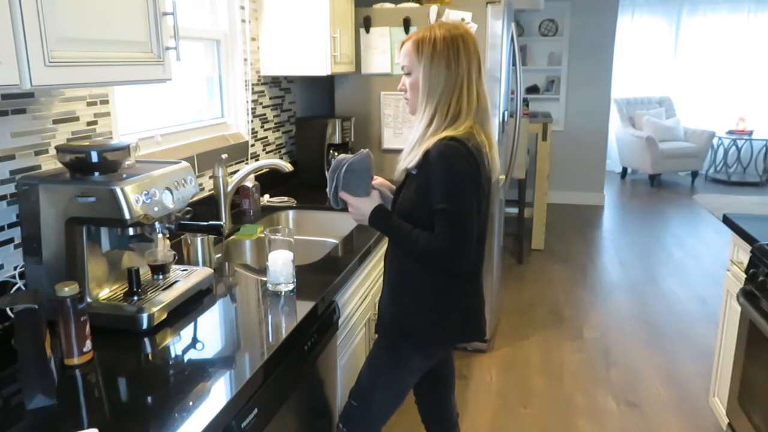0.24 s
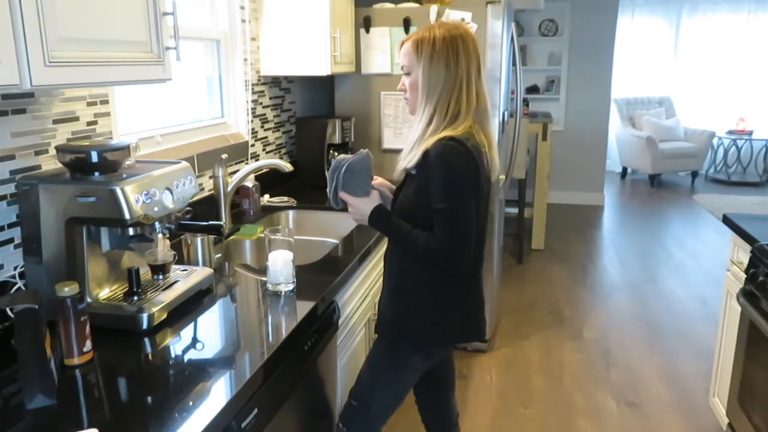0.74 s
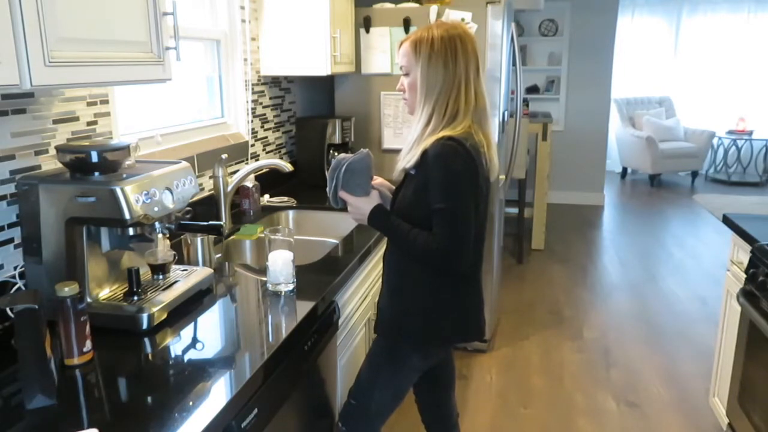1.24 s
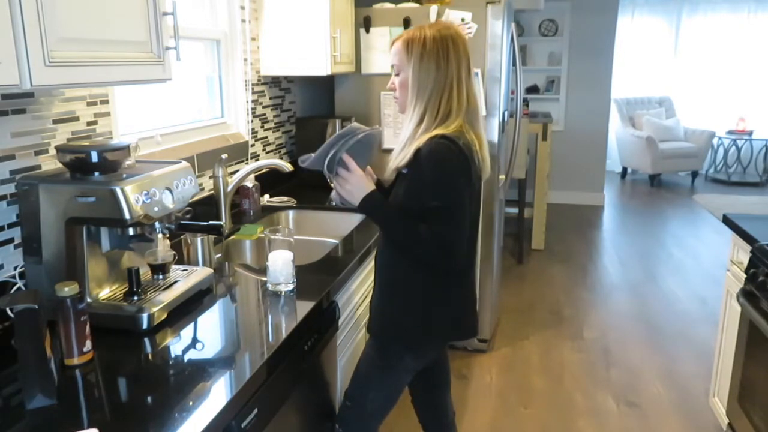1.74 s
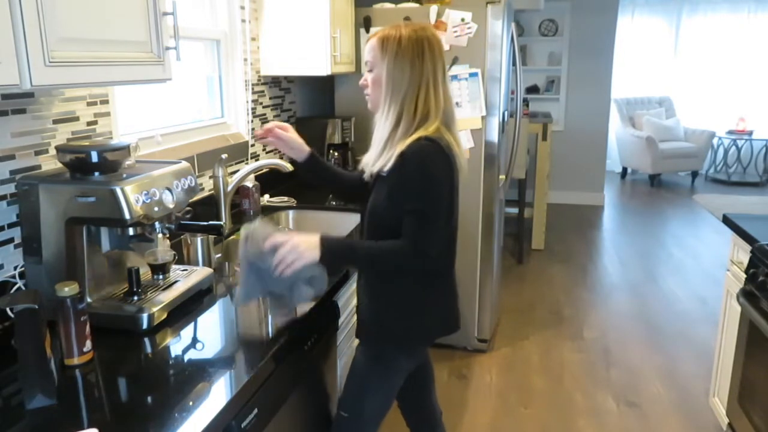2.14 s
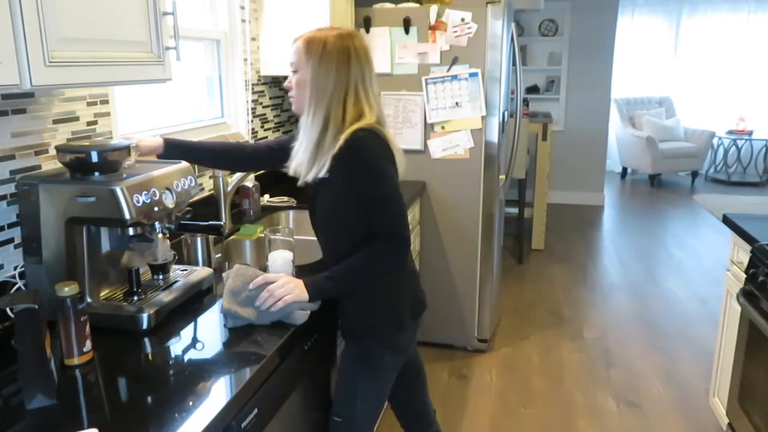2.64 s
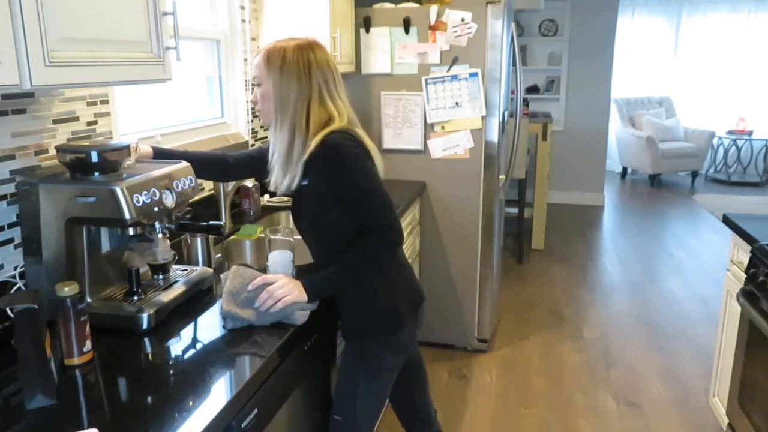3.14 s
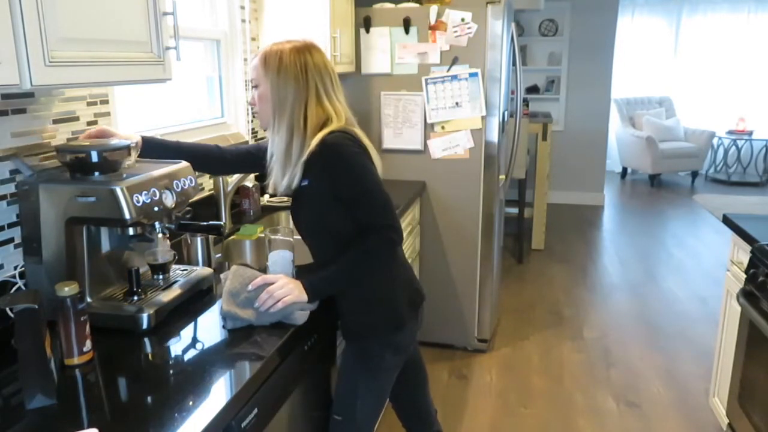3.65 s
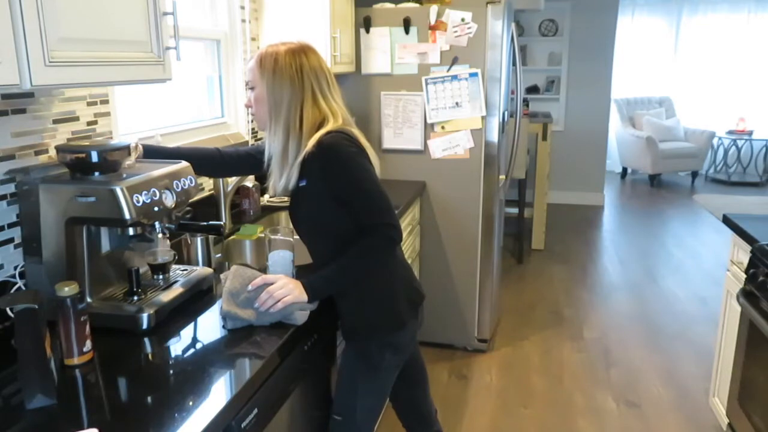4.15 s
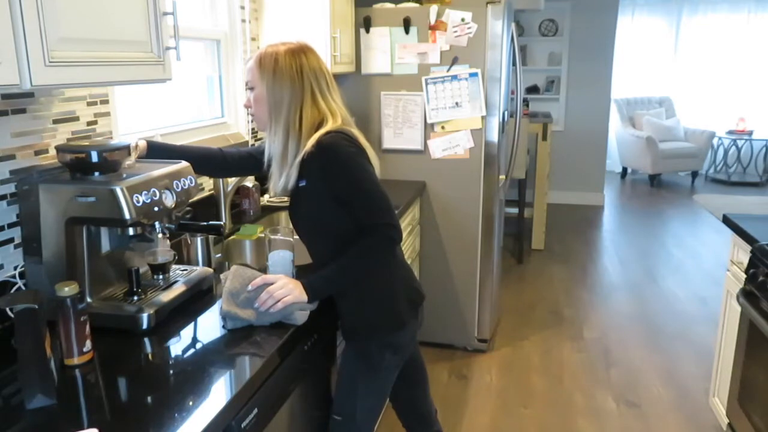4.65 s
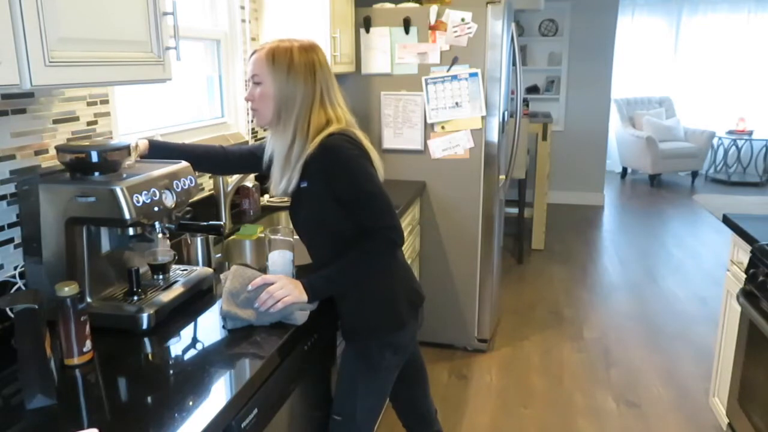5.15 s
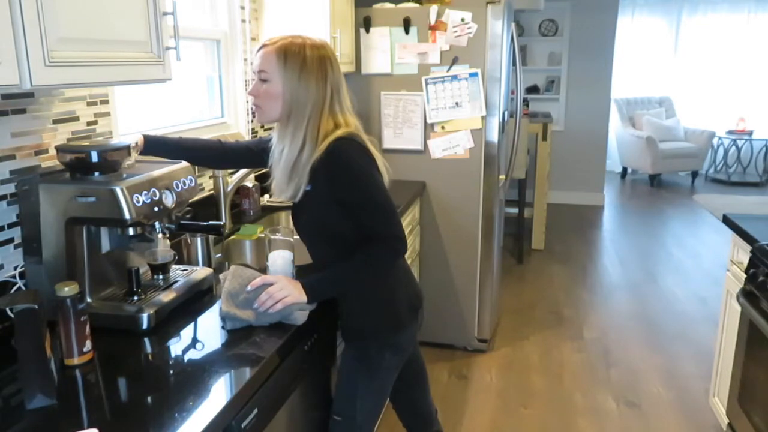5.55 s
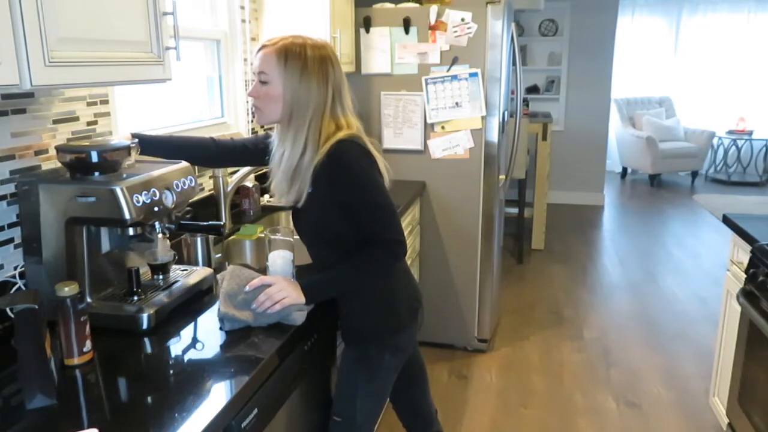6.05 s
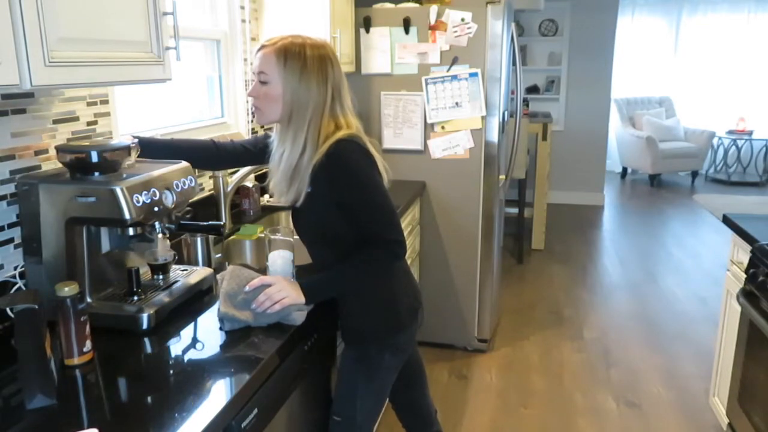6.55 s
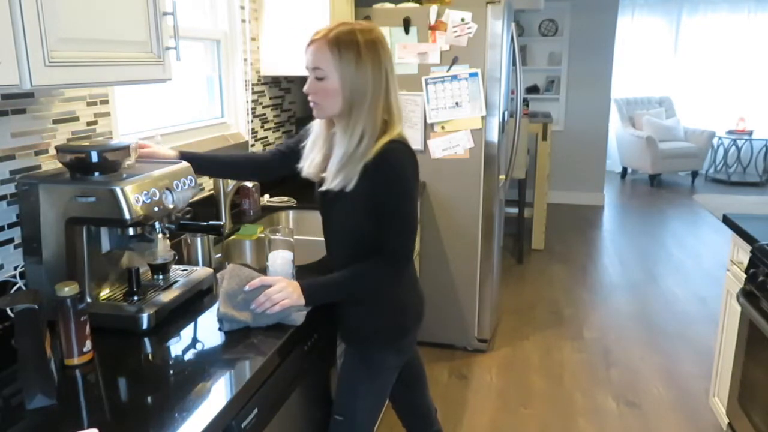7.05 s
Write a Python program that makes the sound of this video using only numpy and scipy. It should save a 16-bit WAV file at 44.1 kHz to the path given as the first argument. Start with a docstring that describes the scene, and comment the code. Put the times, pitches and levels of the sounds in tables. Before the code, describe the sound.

Close stereo pickup in a quiet, hard-surfaced kitchen with short reverberation and a steady, low house hush. From 0 to 0.5 s an espresso machine pump buzzes at mains pitch, rough and rattling, then dies fast. At 0.65 s its valve clunks with a brief bright hiss and a small shudder of the mount. Soft cloth brushing and faint taps run from 0.8 to 1.5 s, with tiny taps near 2.1 s and a sharper tap and brush at 2.5 s. Around 3.1-3.4 s, a dense burst of knocks and dragging clatters on the metal housing. Light brushing follows near 4 s, then two firm knocks at 4.53 and 4.65 s with a short scrape. After near quiet and faint taps, a scrape and double knock at 6.1-6.2 s lead to the loudest, hard crack at 6.35 s. A soft knock with thin hiss at 6.95 s and a low floor bump at 7.2 s close it.

```python
"""A mains-driven piston pump in an espresso machine buzzes for half a second, then dies away.
Its valve clunks and hisses at 0.65 s; light taps and brushing follow, as filtered noise and struck modes.
Cups and parts are set down, slid and knocked on the metal housing, in clusters near 3.2, 4.6 and 6.2 s.
The hardest blow, at 6.35 s, pulls the gain down; a knock with a hiss and a low bump close the scene.
Throughout, a steady hush lies beneath, and the hits sound in a quiet, hard-walled kitchen."""
import sys
import numpy as np
from scipy import signal
from scipy.fft import rfft, irfft, next_fast_len
from scipy.io import wavfile
from scipy.ndimage import uniform_filter1d, map_coordinates

SR = 44100
rng = np.random.default_rng(int(sys.argv[2]) if len(sys.argv) > 2 else 0)


def transcribe(signal):
    """Save signal, clipped to [-1, 1], as a 16-bit WAV file at the path in sys.argv[1]."""
    frames = np.atleast_2d(signal).T
    limited = np.clip(frames, -1, 1)
    pcm = np.round(limited * 32767).astype(np.int16)
    wavfile.write(sys.argv[1], SR, pcm)


N = 321469

# Steady hush of the house, relative spectral density: f/Hz, level/dB
AIR_SPECTRUM = [(12, -45), (20, -18), (54, 1), (95, -2.5), (119, -10.5), (148, -6.5), (297, -3.5),
                (427, -12), (491, -12), (725, -19.5), (857, -18), (1340, -21.5), (1720, -21),
                (12100, -40.5), (15500, -53)]
AIR_DB = -45.5
# Side part of the hush relative to its mid part: f/Hz, level/dB
AIR_SIDE_SPECTRUM = [(60, -56), (110, -16.5), (200, -16), (380, -7.5), (700, -3.5), (1290, -4),
                     (2380, -3.5), (4400, -1.5), (8120, -2.5), (15000, -1)]
# Filter from the near sound to its side part: f/Hz, level/dB
NEAR_SIDE_SPECTRUM = [(60, -64), (110, -64), (200, -42), (380, -26.5), (700, -31), (1290, -29),
                      (2380, -26.5), (4400, -6), (8120, -2.5), (15000, 6.5)]
# Reverberation of the kitchen: f/Hz, t60/s
KITCHEN_DECAY = [(100, 0.19), (260, 0.25), (700, 0.45), (1840, 0.31), (4850, 0.34), (8000, 0.22),
                 (13000, 0.12)]
# Cloth and hands brushing: start t/s, rise t/s, hold t/s, level/dB, fall/(dB/s)
RUSTLE_SWELLS = [(0.78, 0.0099, 0.29, -50, 120), (1.183, 0.059, .012, -55, 58),
                 (1.51, 0.014, .005, -51, 340), (2.255, .012, .005, -50, 240),
                 (2.473, 0.01, .005, -38, 187), (2.86, .008, .005, -60, 80), (3.7, 0.067, .03, -52.5, 200),
                 (3.84, .04, 0.033, -53, 150), (4.04, 0.024, .005, -49.5, 340),
                 (4.12, .07, .005, -52.5, 160), (5.83, .05, .012, -53.5, 74), (5.95, 0.17, .005, -45, 400)]
# Relative spectral density of the brushing: f/Hz, level/dB
BRUSH_SPECTRUM = [(500, 2), (1000, 2.5), (2100, 3), (3200, -6), (5000, -13), (12000, -31.5)]
# Short hisses: start t/s, rise t/s, hold t/s, level/dB, fall/(dB/s)
HISS_SWELLS = [(0.652, 0.0055, 0.0052, -36, 290), (6.94, 0.042, 0.062, -51.5, 370)]
# Relative spectral density of the hisses: f/Hz, level/dB
HISS_SPECTRUM = [(880, -41), (1500, -7), (2220, 6), (2670, -6.5), (3540, -7), (11700, -7.5), (14900, -3),
                 (15500, -44)]
# Low bump through the floor: start t/s, rise t/s, hold t/s, level/dB, fall/(dB/s)
BUMP_SWELL = (7.17, .05, .04, -38.5, 300)
# Harmonics of the piston stroke: multiple of the mains frequency, relative level/dB
STROKE_HARMONICS = [(2, -9), (3, -4), (4, -8), (5, -2), (6, -4), (7, -4), (8, -19), (9, -2.5), (10, -5.5),
                    (11, -11), (12, -6.5), (13, -15.5), (15, -31), (17, -20.5), (18, -14.5), (19, -20),
                    (21, -23), (23, -14), (24, -19), (26, -6), (27, -9), (28, -9), (29, -22), (30, -15),
                    (31, -21), (32, -16), (33, -15), (34, -20), (37, -18), (40, -20), (42, -19), (44, -26),
                    (45, -13), (47, -20), (48, -22), (51, -18), (52, -15), (53, -23), (55, -18)]
# Relative spectral density of the housing rattle: f/Hz, level/dB
RATTLE_SPECTRUM = [(50, -42), (135, -13), (450, -15.5), (730, -10), (910, -17), (1600, -10.5), (2500, -13),
                   (3240, -12.5), (3700, -24.5), (4700, -31), (8000, -36.5), (9000, -33.5), (10500, -41),
                   (14500, -51)]
# Hard jolts shaking the pump mount again: start t/s, rise t/s, hold t/s, level/dB, fall/(dB/s)
JOLT_SWELLS = [(0.74, 0.048, 0.12, -42, 248), (3.27, 0.028, .05, -37, 250)]
# Modes of the housing and the counter under it: f/Hz, relative level/dB, t60/s
HOUSING_MODES = [(146.7, -9, 0.55), (222.6, 2, 0.17), (287.7, 3.5, 0.084), (359, 0, 0.053),
                 (403.5, 3.5, 0.12), (448, 4, 0.092), (541, 3, 0.052), (826, 7, 0.023), (1037, 2.5, 0.022),
                 (1143, 2.5, 0.048), (1372, 4, 0.024), (1596, 2, 0.031), (1760, -0.5, 0.017),
                 (1970, 5, 0.012), (2213, 2, 0.024), (2560, 0, 0.026), (2930, 3, 0.0096),
                 (2960, -21, 0.0067), (3660, -8, 0.0069), (4230, -26, .008), (4700, -19, .008),
                 (5570, -39, 0.0065), (6700, -40, 0.0044)]
# Parts shuddering or dragged on the housing:
# start t/s, rise t/s, hold t/s, relative clatter level/dB, fall/(dB/s), rumble level re clatter/dB
DRAG_SWELLS = [(0.667, 0.0083, 0.032, -41, 236, 11), (3.205, 0.076, 0.0056, -30.5, 350, 7.5),
               (3.316, 0.016, .055, -44, 330, 10.5), (4.675, .012, .005, -46.5, 118, 8.5),
               (4.815, 0.059, .012, -57, 500, 13), (6.115, 0.031, 0.0072, -28, 497, -1.5)]
# Blows on the housing: t/s, relative level/dB, clack f/Hz, thud f/Hz,
# thud level re clack/dB, tick level re clack before a common lift/dB
BLOW_EVENTS = [(.659, -16, 1080, 385, 5.5, -21), (.66, -20.5, 2400, 221, 9.5, -16),
               (0.7, -31, 1090, 340, 1, -24), (1.029, -38, 2520, 190, 0.5, -21),
               (1.103, -36.5, 2500, 166, -8, -21), (1.23, -39.5, 2190, 210, -23, -29),
               (1.268, -38, 2180, 345, -24, -24), (1.37, -39.5, 2200, 245, -10, -28),
               (1.49, -41.5, 2200, 396, -5, -27), (2.007, -37.5, 2700, 242, -6, -30),
               (2.082, -45, 2720, 258, -13, -29), (2.136, -42.5, 2770, 258, -9, -22),
               (2.484, -25, 2500, 264, -19, -17), (2.581, -34, 2510, 232, 6, -28),
               (2.873, -41.5, 1040, 273, 5.5, -14), (2.921, -59, 1190, 328, 0, 5),
               (3.118, -30.5, 1350, 310, -3.5, -39), (3.211, -18.5, 1900, 299, 1.5, -35),
               (3.224, -16, 1570, 298, 1.5, -28), (3.254, -19, 1490, 450, 4.5, -21),
               (3.269, -18.5, 2190, 423, -1, -23), (3.285, -14, 990, 298, 2, -26),
               (3.3, -22.5, 1040, 148, 11.5, -14), (3.348, -19.5, 1590, 383, -3, -19),
               (4.077, -52, 1510, 150.3, -16, 0), (4.533, -18, 1900, 243, -4, -44),
               (4.542, -28.5, 1730, 200, -9, -17.5), (4.647, -17.5, 1840, 465, -5, -44),
               (5.524, -44, 1700, 242, -17, -25), (5.847, -43, 1870, 296, -11, -24),
               (6.136, -18, 2760, 470, 2, -20), (6.15, -15.5, 1400, 438, -0.5, -31),
               (6.195, -28.5, 1440, 443, 5.5, -27), (6.322, -21.5, 2270, 413, 5, -29),
               (6.347, -4.5, 3160, 450, -10, -10.5), (6.352, 3, 2060, 250, 1.5, -58),
               (6.945, -40, 1960, 282, 10.5, -19)]

MAINS_HZ = 60.03
PUMP_DB, PUMP_OFF_S, PUMP_FALL_DB_PER_S = -26, 0.49, 135
BUZZ_DB, RATTLE_DB = -2.0, -4.0  # relative to the pump level
SWING_DB, SWING_OFF_S, SWING_FALL_DB_PER_S = -28, 0.578, 330
CONTACT_MS, SHORTER_MS_PER_DB = 1.29, 0.045  # time constant at 0 dB; harder blows are shorter
FOCUS_DB_PER_OCTAVE = -13.5  # how fast modes away from the struck pitch fall off
TICK_LIFT_DB, HITS_DB = 1.0, 1.0
SPLIT_HZ = 650  # modes below make the thud or rumble, those above the clack or clatter
BLOW_LENGTH = 4096  # samples
EDGE_HZ = 15550  # upper band limit


def gain_of(db):
    """Logarithmic level: 20 dB is a factor of ten in amplitude."""
    return 10 ** (np.asarray(db) / 20)


def evened(x):
    """Normalisation of power: scales to rms 1."""
    return x / np.sqrt(np.mean(x ** 2) + 1e-20)


def read(points, hz):
    """Interpolation on a logarithmic frequency axis: reads a table at hz."""
    f, value = np.transpose(points)
    return np.interp(np.log(hz + 1), np.log(f + 1), value)


def coloured(x, points, turn=1):
    """Linear filtering by a spectrum table; turn is a common complex phase factor."""
    n = next_fast_len(N)
    response = gain_of(read(points, np.fft.rfftfreq(n, 1 / SR))) * turn
    return irfft(rfft(x, n) * response, n)[:N]


def drift(per_s):
    """Slow random fluctuation: a cubic curve through per_s Gaussian knots a second."""
    knots = rng.standard_normal(len(np.arange(-1, N / SR * per_s + 2)))
    return map_coordinates(knots, [np.arange(N) / SR * per_s + 1], order=3)


def held(db, off_s, fall_db_per_s):
    """Exponential decay: a level steady from the start, falling linearly in dB after off_s."""
    return gain_of(db - fall_db_per_s * np.maximum(np.arange(N) / SR - off_s, 0))


def swell(start_s, rise_s, hold_s, db, fall_db_per_s):
    """Quadratic onset and exponential decay: a level that rises, holds, then dies away."""
    t = np.arange(N) / SR - start_s
    rise = np.clip(t / max(rise_s, 1e-4), 0, 1) ** 2
    return rise * gain_of(db - fall_db_per_s * np.maximum(t - rise_s - hold_s, 0))


def air():
    """Diffuse field: the house's slowly swelling hush, with an unrelated side part."""
    mid, side = rng.standard_normal((2, N))
    hush = coloured(mid, AIR_SPECTRUM)
    scale = gain_of(AIR_DB + 0.09 * drift(2.74)) / np.std(hush)
    hush_side = coloured(coloured(side, AIR_SPECTRUM), AIR_SIDE_SPECTRUM)
    return scale * hush, scale * hush_side


def kitchen(x, count):
    """Reverberation: dense random echoes, each band decaying at its own rate, turn steadily for width."""
    taps = rng.standard_normal((count, SR // 2)) * (np.arange(SR // 2) > 150)  # silent until the first echo
    hz, t, z = signal.stft(taps, SR, nperseg=256)
    decay = gain_of(-60 * t / read(KITCHEN_DECAY, hz)[:, None])
    tail = signal.istft(z * decay, SR, nperseg=256)[1]
    # the patterns trade places at 9 turns a second, a quarter turn apart
    turn = 2 * np.pi * (np.arange(N) / SR * 9 + np.arange(count)[:, None] / 4)
    echoes = signal.fftconvolve(x * np.cos(turn), tail / np.linalg.norm(tail[0]), axes=1)
    return echoes[:, :N].sum(0)


def rustle():
    """Friction noise: brushing as fine random grains whose level fluctuates in clumps."""
    grains = rng.standard_normal(N) * gain_of(1.8 * drift(60.0))
    return evened(coloured(grains, BRUSH_SPECTRUM)) * sum(swell(*shape) for shape in RUSTLE_SWELLS)


def floor_bump():
    """Low-frequency transmission through the floor: a brief swell of deep noise."""
    spectrum = [(20, -13), (50, 1), (110, 3), (250, -17), (600, -62)]  # f/Hz, level/dB
    return evened(coloured(rng.standard_normal(N), spectrum)) * swell(*BUMP_SWELL)


def hisses():
    """Broadband flow noise: thin, bright noise under short envelopes."""
    hiss = evened(coloured(rng.standard_normal(N), HISS_SPECTRUM))
    return hiss * sum(swell(*shape) for shape in HISS_SWELLS)


def mount_swing():
    """Forced vibration: the mount swings at the mains pitch, stops late, and is shaken again by jolts."""
    swing = np.sqrt(2) * np.cos(2 * np.pi * MAINS_HZ * np.arange(N) / SR)
    level = held(SWING_DB, SWING_OFF_S, SWING_FALL_DB_PER_S)
    return swing * (level + sum(swell(*shape) for shape in JOLT_SWELLS))


def stroke_buzz():
    """Fourier series of one stroke per mains cycle: low harmonics steadier, high ones wavering."""
    n = SR  # one second outlasts the running pump
    turns = MAINS_HZ * np.arange(n) / SR
    buzz = np.zeros(N)
    for k, db in STROKE_HARMONICS:
        waver = np.interp(turns, np.arange(0, 64, 4), rng.standard_normal(16))  # a knot every 4 strokes
        level = gain_of(db + min(0.22 * k, 4.0) * waver)
        buzz[:n] += level * np.cos(2 * np.pi * (k * turns + rng.random()))
    return buzz


def housing_rattle():
    """Amplitude modulation: rattling noise of the housing throbs with each stroke."""
    phase = MAINS_HZ * np.arange(N) / SR % 1
    throb = 1.7 + np.exp(-phase / 0.51)
    return evened(coloured(throb * rng.standard_normal(N), RATTLE_SPECTRUM))


def pump():
    """Superposition: stroke buzz and rattle die together while the mount swings on."""
    running = gain_of(BUZZ_DB) * stroke_buzz() + gain_of(RATTLE_DB) * housing_rattle()
    return held(PUMP_DB, PUMP_OFF_S, PUMP_FALL_DB_PER_S) * running + mount_swing()


def rings(detune, length):
    """Modal decomposition: each housing mode is a dying sine, returned with its nominal pitch."""
    hz, db, t60 = np.transpose(HOUSING_MODES)[:, :, None]
    t = np.arange(length) / SR
    pitch = hz * (1 + 0.043 * detune[:len(hz), None])
    return hz[:, 0], gain_of(db - 60 * t / t60) * np.sin(2 * np.pi * pitch * t)


def drags():
    """Stick-slip excitation: a dense random run of small slips shakes all modes at once."""
    hz, modes = rings(np.zeros(len(HOUSING_MODES)), 5000)
    slips = rng.standard_normal((2, N)) * (rng.random((2, N)) < 900 / SR)  # about 900 slips a second
    responses = [(hz < SPLIT_HZ) @ modes, (hz > SPLIT_HZ) @ modes]
    rumble, clatter = signal.oaconvolve(slips, responses, axes=1)[:, :N]
    rumble, clatter = evened(rumble), evened(clatter)
    return sum(swell(*shape) * (clatter + gain_of(rumble_db) * rumble)
               for *shape, rumble_db in DRAG_SWELLS)


def blow(db, clack_hz, thud_hz, thud_db, tick_db, grit, detune):
    """Impact excitation: a rough contact rings modes near the thud and clack pitches; the treble ticks."""
    u = np.arange(len(grit)) / SR * 1000 / (CONTACT_MS - SHORTER_MS_PER_DB * db)
    contact = grit * u ** 1.7 * np.exp(-u)
    # flatten the spectrum, so that the blow pushes all pitches nearly evenly
    z = rfft(contact)
    contact = irfft(z / (abs(z) + 0.2 * abs(z).mean())) * np.minimum(u, 1) * np.exp(-u / 4)
    hz, modes = rings(detune, len(grit))
    low = gain_of(FOCUS_DB_PER_OCTAVE * abs(np.log2(hz / thud_hz))) * (hz < SPLIT_HZ)
    high = gain_of(FOCUS_DB_PER_OCTAVE * abs(np.log2(hz / clack_hz))) * (hz > SPLIT_HZ)
    responses = [low @ modes, high @ modes]
    thud, clack = signal.fftconvolve(responses, contact[None], axes=1)[:, :len(u)]
    tick = signal.lfilter(*signal.butter(1, [4000, 9000], "band", fs=SR), contact)
    parts = ((thud_db, thud), (0, clack), (tick_db + TICK_LIFT_DB, tick))
    fade = np.cos(np.linspace(0, np.pi / 2, len(u)))
    return fade * gain_of(db) * sum(gain_of(level) * part / abs(part).max() for level, part in parts)


def knocks():
    """Linear superposition: every blow is added at its moment."""
    out = np.zeros(N + BLOW_LENGTH)
    for start_s, *row in BLOW_EVENTS:
        grit, detune = rng.standard_normal((2, BLOW_LENGTH))
        out[round(start_s * SR):][:BLOW_LENGTH] += blow(*row, grit, detune)
    return out[:N]


def scene():
    """Mid-side stereo at two close ports: the side is a quarter-turned mid plus unrelated echoes."""
    highpass = signal.butter(8, 142, "high", fs=SR, output="sos")  # keeps the hits' onsets free of deep bass
    hits = signal.sosfilt(highpass, knocks() + drags())
    hush, hush_side = air()
    mid = gain_of(HITS_DB) * hits + kitchen(hits, count=2)
    mid += pump() + hisses() + floor_bump() + rustle()
    side = coloured(0.75 * mid + 0.6 * kitchen(mid, count=2), NEAR_SIDE_SPECTRUM, turn=1j)
    mid, side = mid + hush, side + hush_side
    return np.array([mid + side, mid - side])


def record(dry):
    """Dynamic compression: gain drops at the loudest peaks and creeps back; then a band limit."""
    peak_db = 20 * np.log10(uniform_filter1d(abs(dry).max(0), 60) + 1e-9)
    fall = np.arange(N) * 10.7 / SR  # recovery at 10.7 dB/s
    excess_db = 0.76 * (peak_db + 13.0)  # 0.76 dB of reduction per dB above -13 dB
    over_db = np.maximum(np.maximum.accumulate(excess_db + fall) - fall, 0)
    ducked = dry / gain_of(uniform_filter1d(over_db, 400))
    lowpass = signal.firwin(1023, EDGE_HZ, window=("kaiser", 9), fs=SR)
    return signal.oaconvolve(ducked, lowpass[None], "same")


dry = scene()
out = record(dry)
transcribe(out)
```